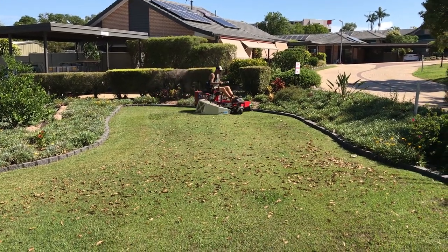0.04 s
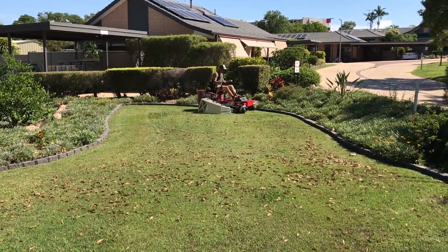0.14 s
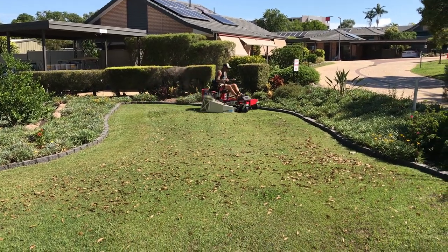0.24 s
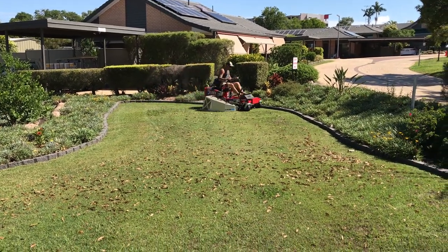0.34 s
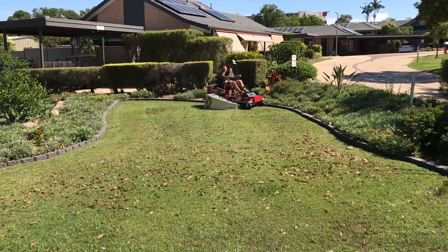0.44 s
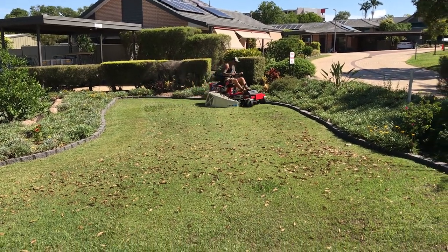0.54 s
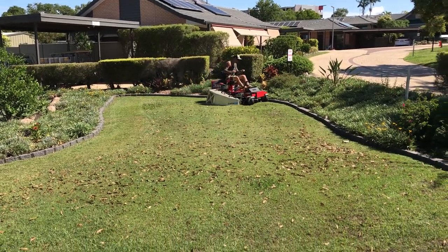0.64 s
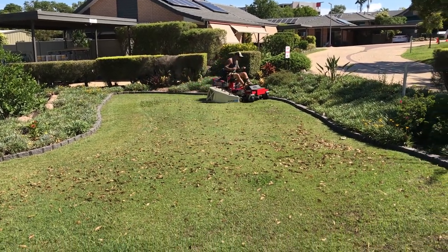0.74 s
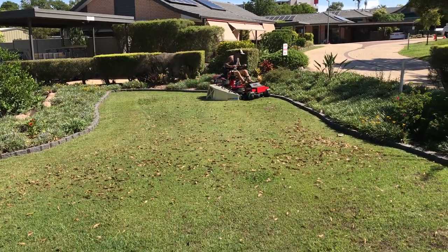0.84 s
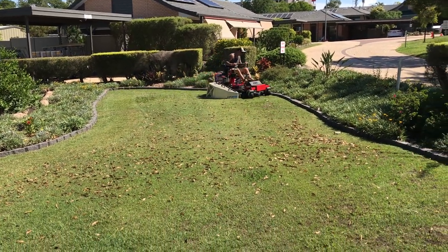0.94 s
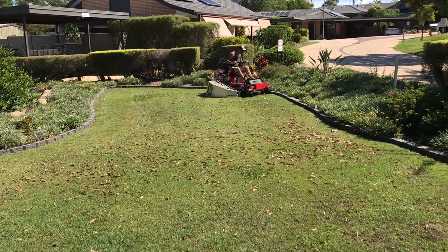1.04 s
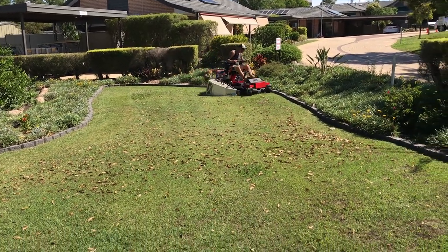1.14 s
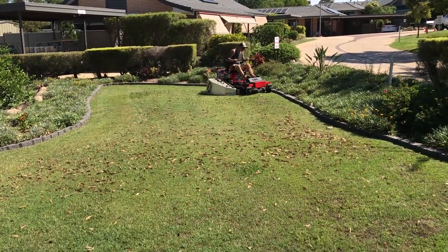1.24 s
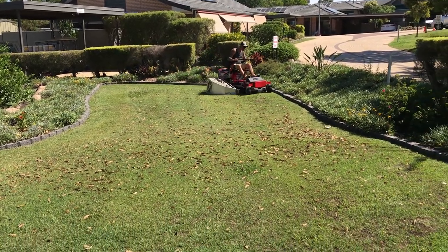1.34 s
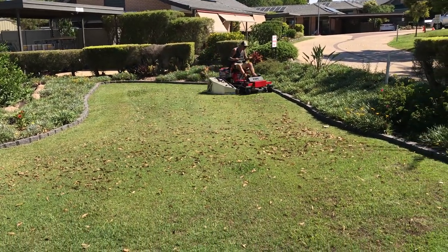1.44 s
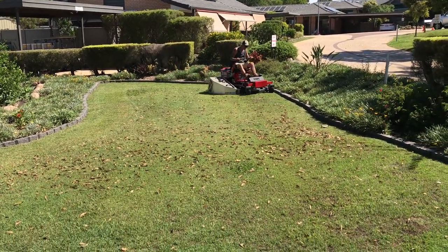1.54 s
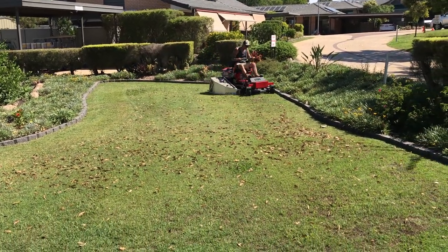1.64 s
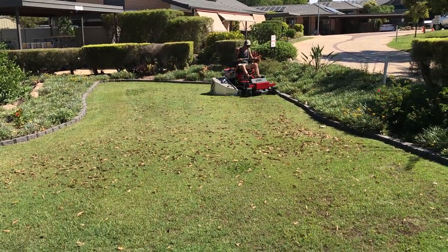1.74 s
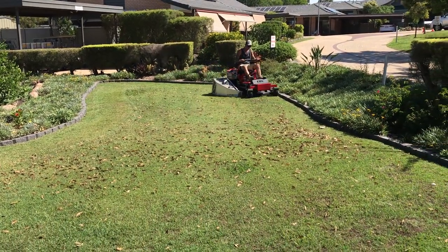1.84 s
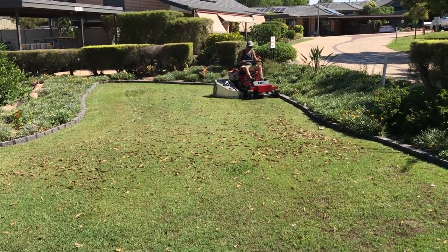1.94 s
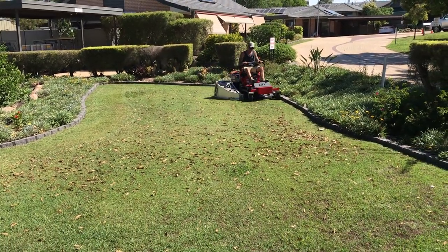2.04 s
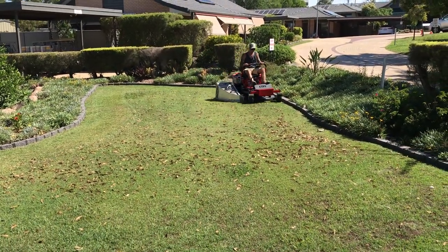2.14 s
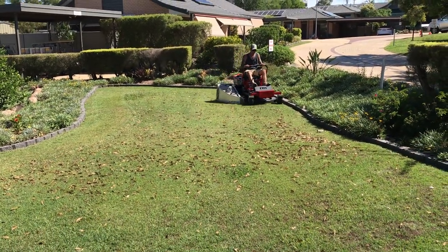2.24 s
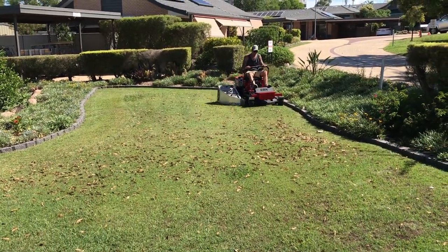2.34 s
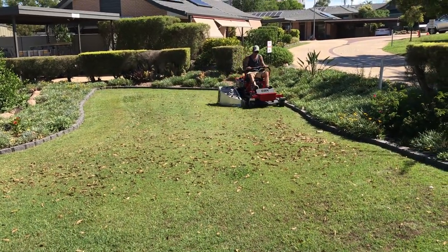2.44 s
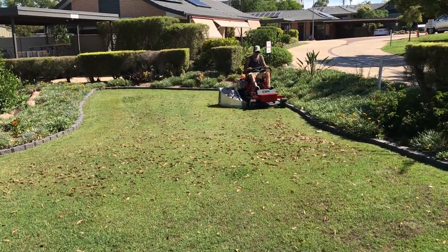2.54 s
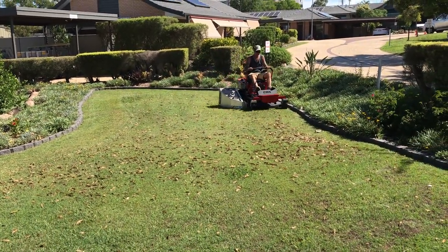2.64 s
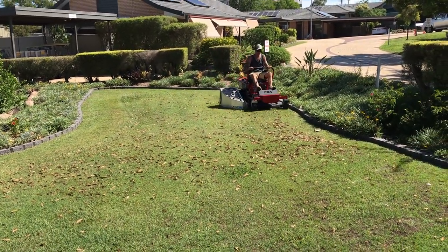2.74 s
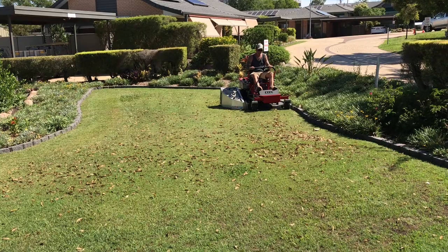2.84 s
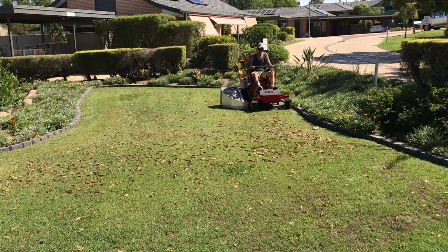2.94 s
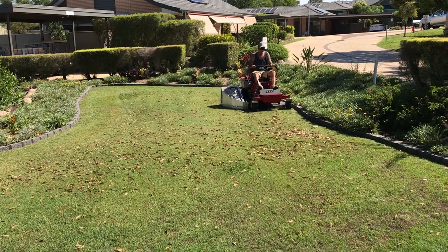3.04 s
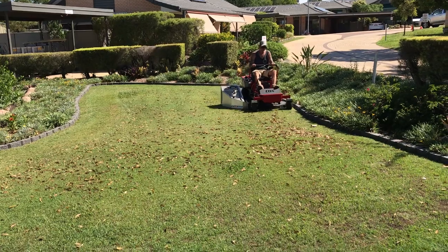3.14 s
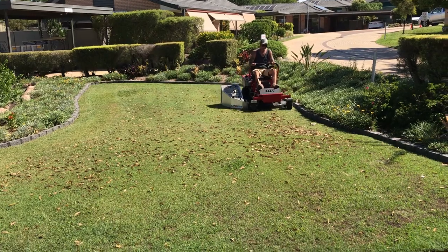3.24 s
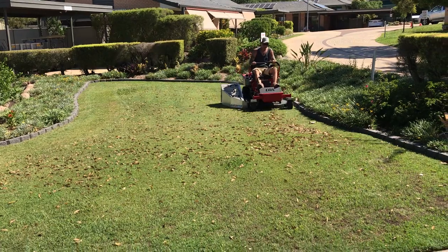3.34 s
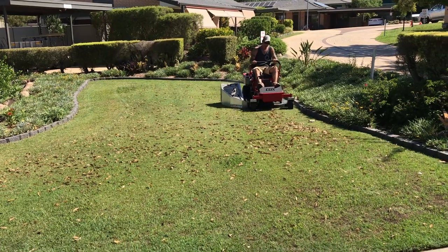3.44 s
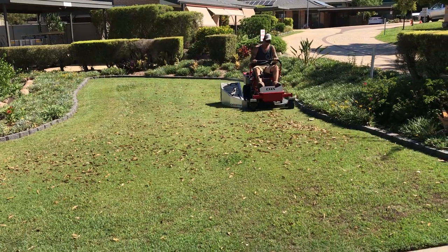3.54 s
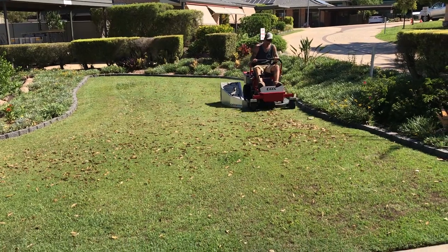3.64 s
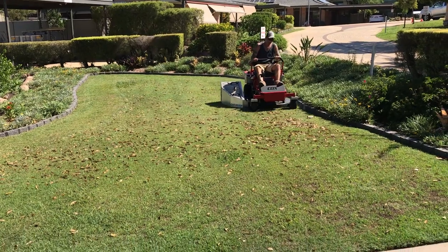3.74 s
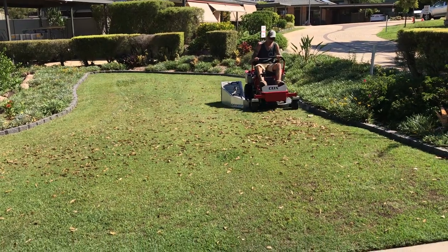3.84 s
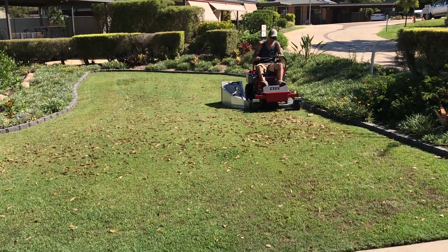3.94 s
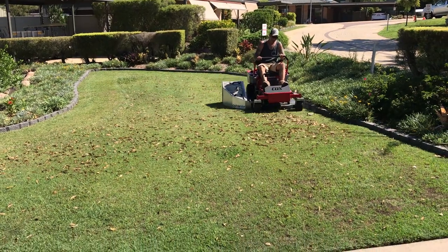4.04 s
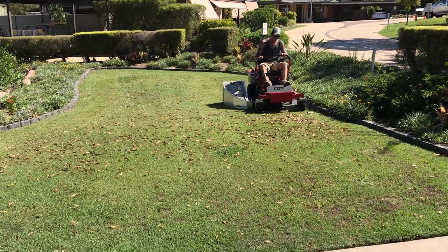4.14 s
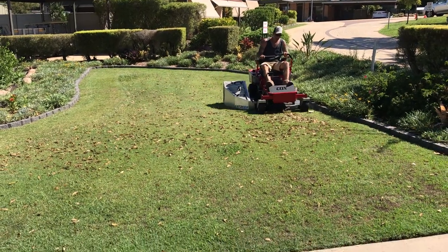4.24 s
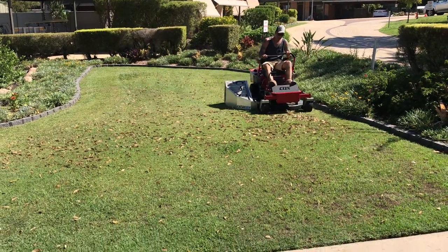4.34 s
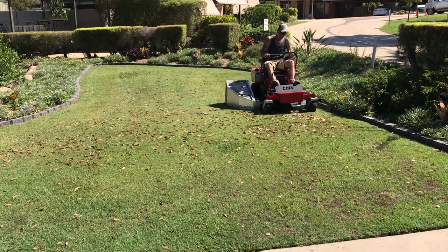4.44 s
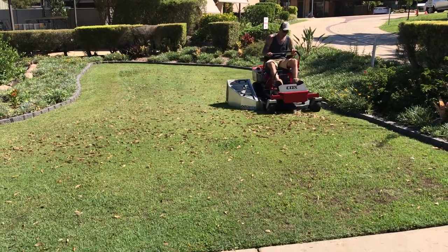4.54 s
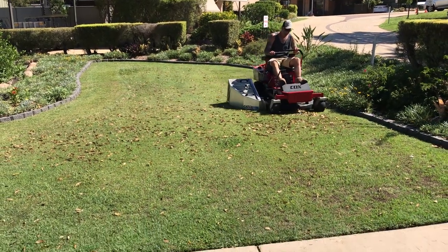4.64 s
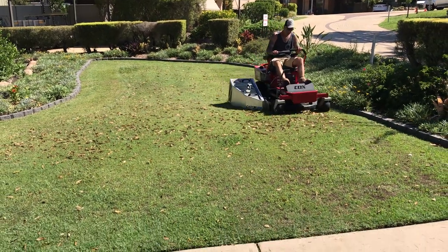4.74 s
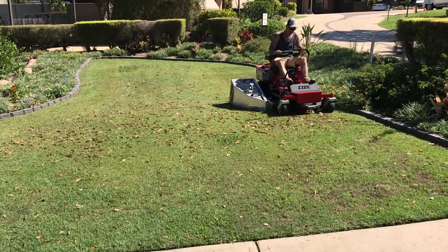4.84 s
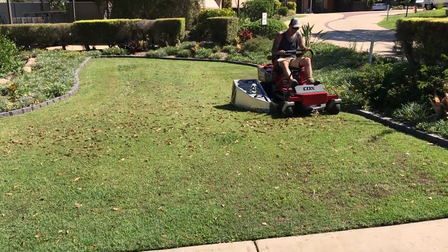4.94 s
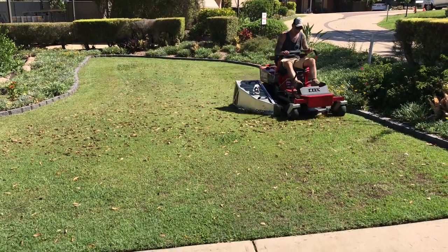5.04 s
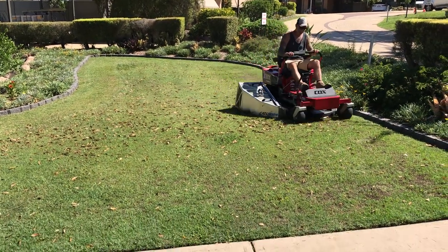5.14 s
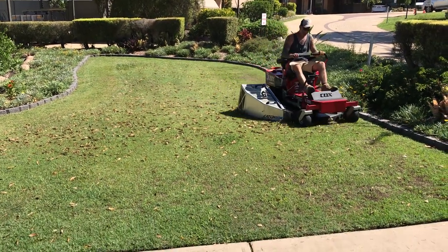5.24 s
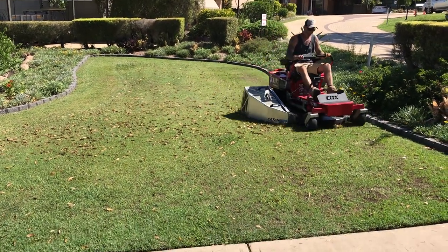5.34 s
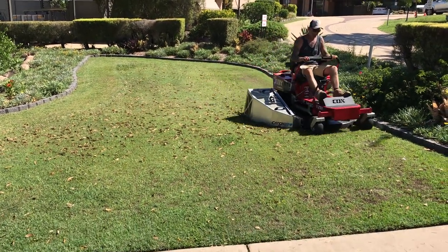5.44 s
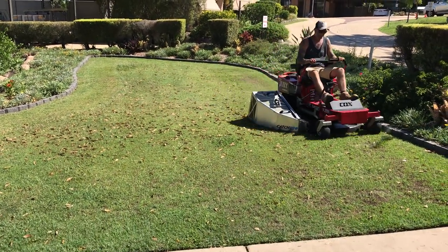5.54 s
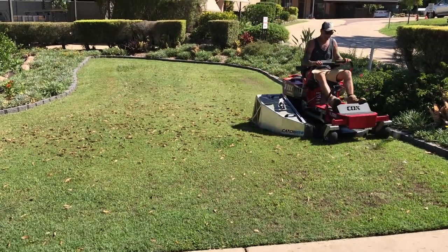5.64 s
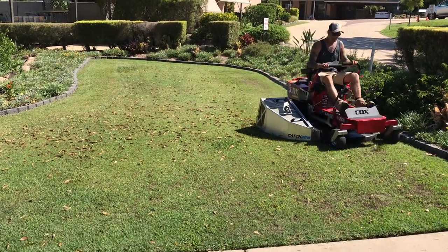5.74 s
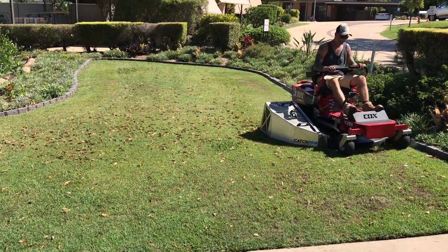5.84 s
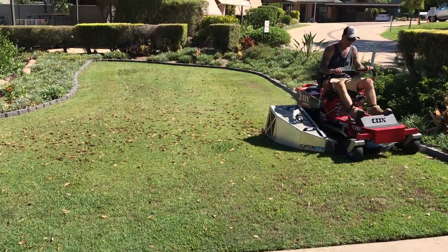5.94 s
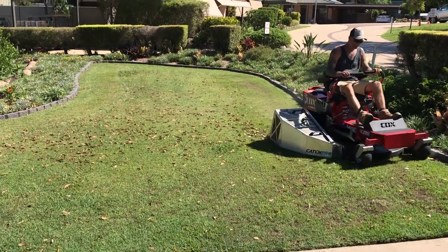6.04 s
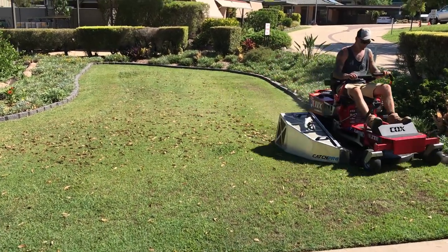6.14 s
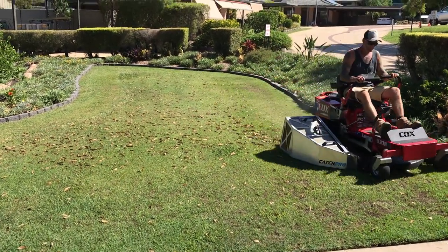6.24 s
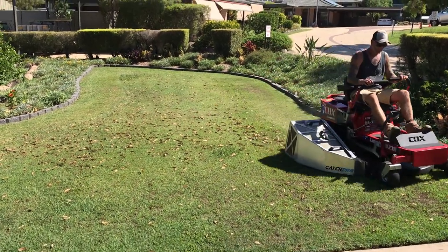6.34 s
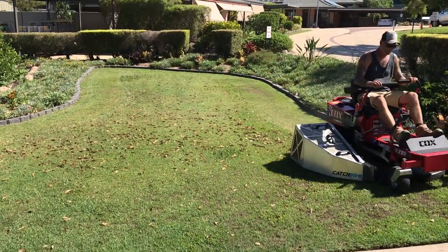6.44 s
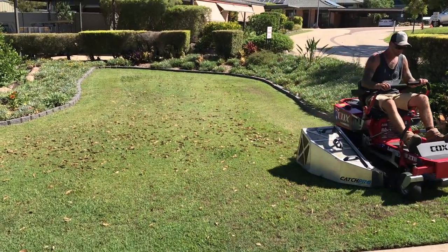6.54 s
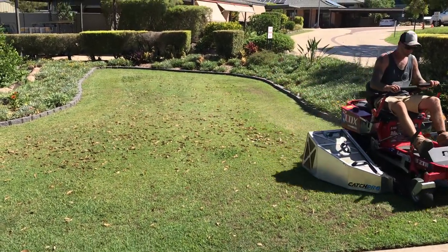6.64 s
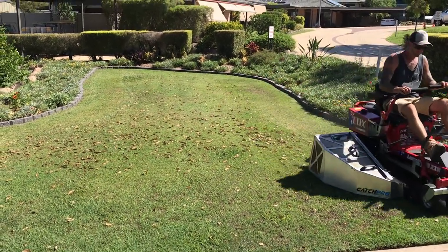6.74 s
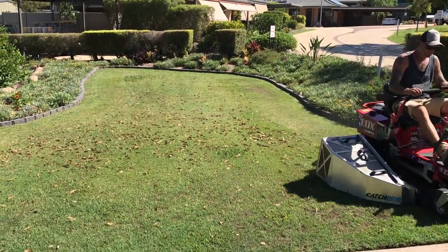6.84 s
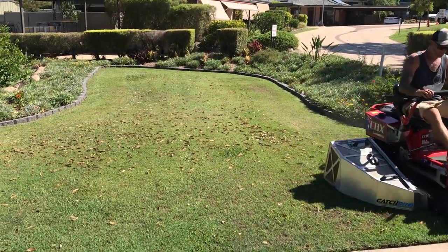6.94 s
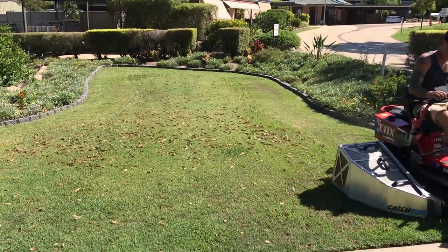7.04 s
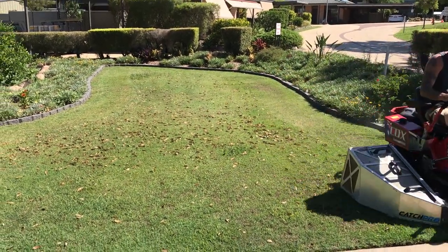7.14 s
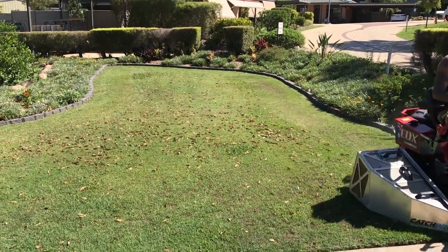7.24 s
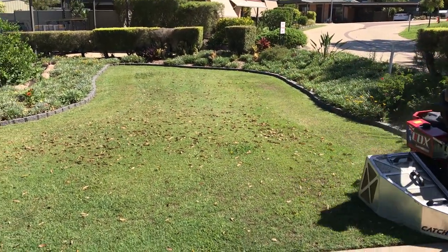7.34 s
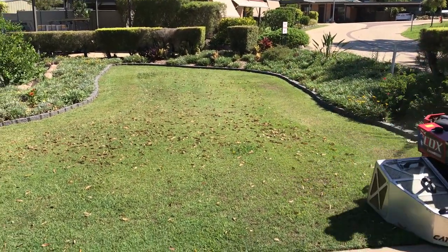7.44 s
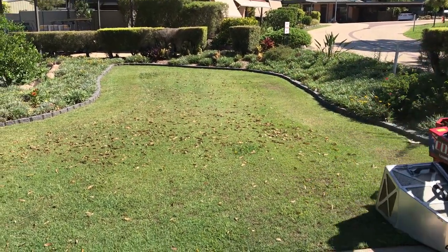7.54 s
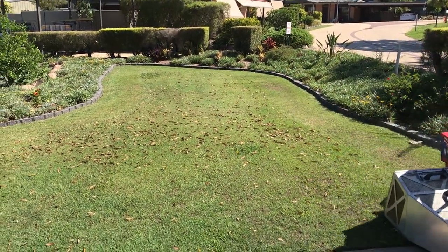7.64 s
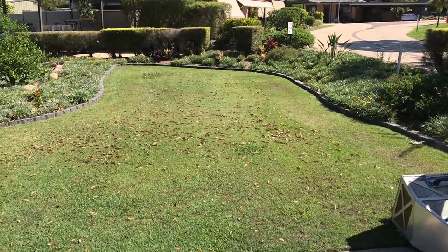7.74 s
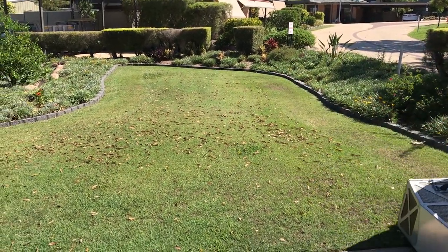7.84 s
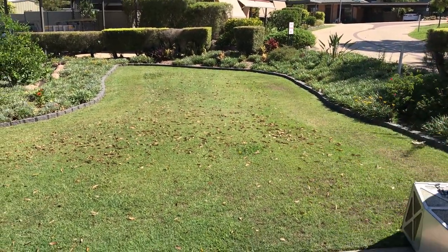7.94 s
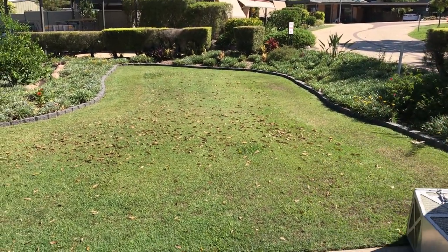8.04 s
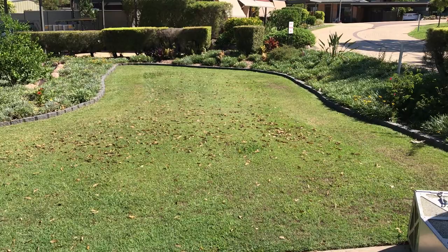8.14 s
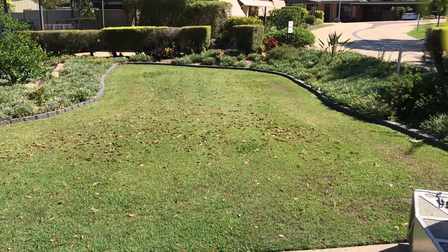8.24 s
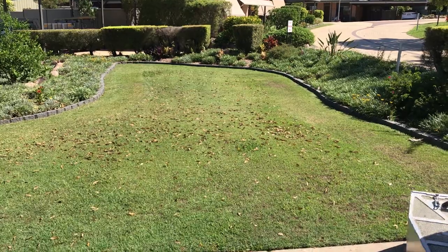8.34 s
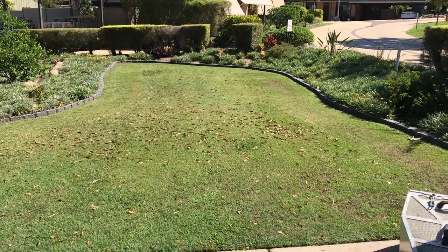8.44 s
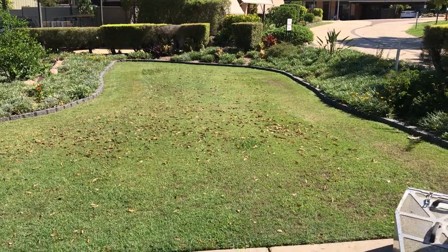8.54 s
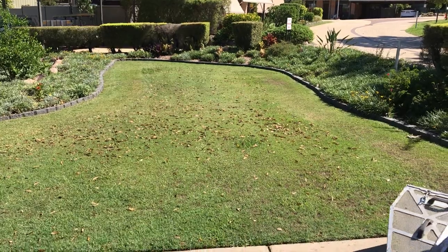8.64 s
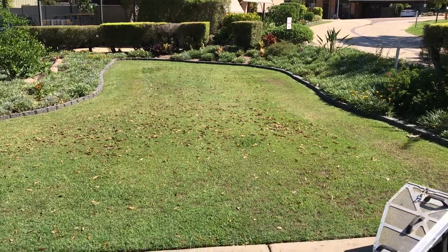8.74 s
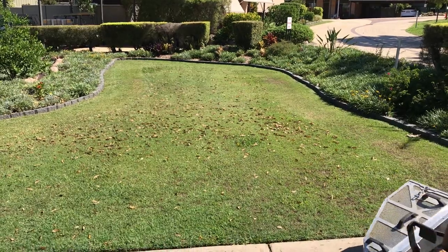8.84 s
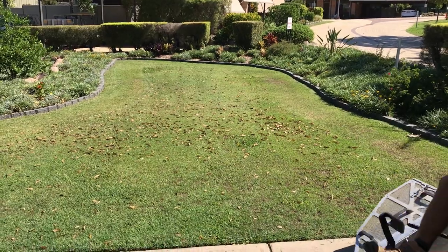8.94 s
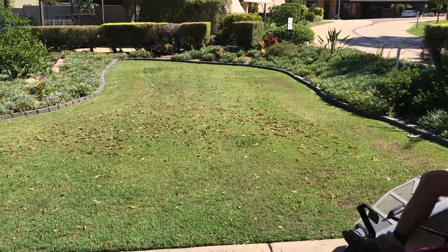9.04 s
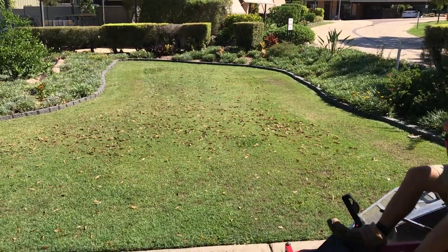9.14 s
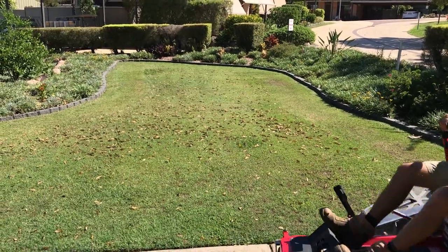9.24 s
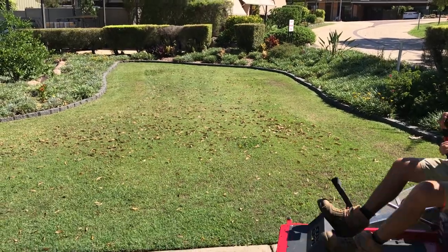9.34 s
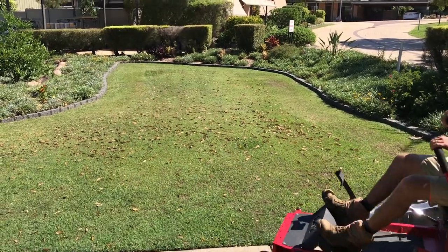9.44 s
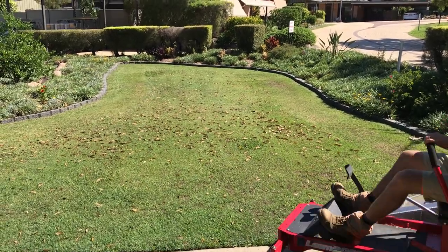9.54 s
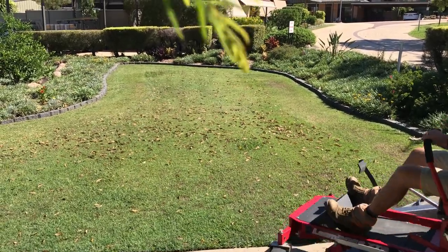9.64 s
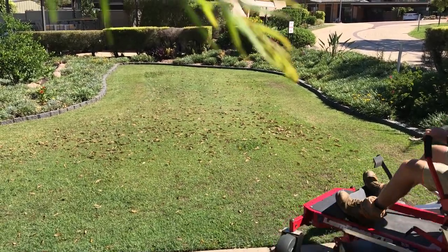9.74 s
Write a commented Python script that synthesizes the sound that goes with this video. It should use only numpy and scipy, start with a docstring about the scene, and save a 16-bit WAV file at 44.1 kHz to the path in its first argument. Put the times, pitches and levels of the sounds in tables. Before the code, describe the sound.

Steady thumping mower engine and roaring cutting deck approach from a distance, with hiss, snapping twigs, and a sharp chirp and squeal in the closing turn.

```python
"""The uneven thump of a V-twin ride-on mower nears up a lawn until it is close by and turning.
Paired firing pulses ring through a muffler filter, looped noise clatters, and chopped noise roars in the deck.
Coloured hiss is cooling air, short noise cracks are shredded grass, dry leaves and twigs.
Swept sines make the running gear chirp now and then and squeal in the turn; one microphone hears it all."""
import sys
import numpy as np
from scipy import signal
from scipy.fft import rfft, irfft
from scipy.io import wavfile
from scipy.ndimage import uniform_filter1d

SR = 44100
rng = np.random.default_rng(int(sys.argv[2]) if len(sys.argv) > 2 else 0)


def file_out(sig):
    """Save sig as 16-bit WAV at sys.argv[1]."""
    # one column per channel
    cols = np.atleast_2d(sig).T
    # limit, then scale
    lim = np.clip(cols, -1, 1)
    pcm = np.round(lim * 32767).astype(np.int16)
    wavfile.write(sys.argv[1], SR, pcm)


N = 432180
T = np.arange(N) / SR  # time of each sample, s


def undb(db):
    """Decibels to gain."""
    return 10 ** (np.asarray(db) / 20)


def unit(x):
    """Scale to rms 1."""
    return x / np.std(x)


def curves(table):
    """Draw each column of a (time, values) table as an automation curve, one value a sample."""
    s, *columns = np.transpose(table)
    return [np.interp(T, s, column) for column in columns]


def bump(s, half):
    """A smooth rise and fall that peaks at 1 at time s."""
    return np.exp(-((T - s) / half) ** 2)


def walk(rate):
    """Random levels held 1 / rate s and slewed twice; spread near 1."""
    size = 8  # steps per held level
    held = np.repeat(rng.standard_normal(8192), size)
    slewed = uniform_filter1d(uniform_filter1d(held, size), size)
    return 1.39 * np.interp(T * rate * size, np.arange(len(held)), slewed)


def colour(x, points):
    """Causal minimum-phase filter with the given (Hz, dB) response."""
    size = 16384
    hz, db = np.transpose(points)
    bin_hz = np.arange(size // 2 + 1) * SR / size
    log_gain = np.log(undb(np.interp(np.log(bin_hz + 1), np.log(hz), db)))
    # folding the cepstrum forward in time makes the response causal
    cepstrum = irfft(log_gain)[:size // 2]
    cepstrum[1:] *= 2
    response = irfft(np.exp(rfft(cepstrum, size)))[:size // 2]
    return signal.fftconvolve(x, response)[:len(x)]


def noise(points):
    """Noise of rms 1 with the given spectrum."""
    return unit(colour(rng.standard_normal(N), points))


def approach(x, table, near):
    """Crossfade a source through its far, halfway and alongside spectra as it nears."""
    table = np.array(table)
    out = 0
    for k in range(table.shape[1] - 1):
        share = np.maximum(1 - np.abs(near - k), 0)
        out = out + share * unit(colour(x, table[:, [0, k + 1]]))
    return out


def carry(metres, level_db, loss_db):
    """Gain over distance: a level at 1 m and a loss per doubling of distance."""
    return undb(level_db - loss_db * np.log2(metres))


def tones(turns, orders):
    """Sine lines locked to a shaft, each wavering in level and phase."""
    waver_db, wander_rad = 2.6, 0.9
    out = 0
    for order, db in orders:
        level = undb(db + waver_db * walk(4))
        phase = 2 * np.pi * round(order) * turns + wander_rad * walk(6)
        out = out + level * np.sqrt(2) * np.sin(phase)
    return out


def load(delay=0):
    """How far thick grass pulls the engine's cycle rate down, in Hz."""
    # patches of thick grass: (time [s], half length [s], sag [Hz])
    thick_grass = [(1.098, .35, .2), (2.045, .4, .33), (3.145, .13, .24), (4.723, .16, .3),
                   (5.483, .15, .38), (6.598, .26, .42), (9.086, .35, .15), (9.8, 0.23, 0.56)]
    return sum(sag * bump(s + delay, half) for s, half, sag in thick_grass)


def rumble(metres, waver_db=3):
    """Low buffeting: bass-heavy noise that wavers and now and then swells."""
    # spectrum of the buffeting: (frequency [Hz], level per Hz [dB])
    buffeting = [(8, -78), (33, -31), (48, -7), (65, -7), (90, -8), (130, -1.5), (230, -7.5), (400, -20),
                 (900, -40.5)]
    # swells of the buffeting: (time [s], half length [s], level [dB])
    surges = [(.25, 0.16, -37), (2.3, .2, -42), (3.023, 0.092, -33.5), (4.003, 0.087, -33),
              (4.82, 0.065, -30), (6.35, 0.21, -38), (7.403, 0.25, -26), (9.4, .1, -23)]
    steady = carry(metres, level_db=-28.5, loss_db=3.3) * undb(waver_db * walk(5))
    swells = sum(undb(db) * bump(s, half) for s, half, db in surges)
    return noise(buffeting) * np.hypot(steady, swells)


def cooling_air(spindle, metres, pulsing=0.12, flicker_db=1.0, outlet_waver_db=0.5):
    """Hiss that pulses once a blade turn; the outlet adds its own rush once it faces the listener."""
    # spectrum of the cooling air: (frequency [Hz], level per Hz [dB])
    air_hiss = [(1500, -6.5), (2900, -4), (3600, 4.5), (4500, 3), (5100, 2), (5800, 4), (7200, -3.5),
                (9000, -6), (11500, -12), (16000, -23)]
    # spectrum of the air outlet, heard close by: (frequency [Hz], level per Hz [dB])
    outlet_rush = [(1650, -43.5), (2800, -7.5), (4040, 0.5), (5790, -0.5), (7630, -9.5), (9370, -15),
                   (10300, -16.5), (11600, -15), (13000, -19.5)]
    # the outlet comes into view as the mower draws level, and swings in the turn:
    # (time [s], level against the hiss [dB])
    outlet_view = [(7.1, -30), (7.32, 2), (8.15, 6), (8.7, 3), (9.1, 7), (9.8, 7)]
    outlet = noise(outlet_rush) * undb(curves(outlet_view)[0] + outlet_waver_db * walk(8))
    pulse = 1 + pulsing * np.cos(2 * np.pi * spindle)
    level = carry(metres, level_db=-26, loss_db=5.33) * undb(flicker_db * walk(16))
    return (noise(air_hiss) + outlet) * pulse * level


def shredding(spindle, near, snaps_per_s=520, spread_db=4.8, snap_s=0.0007, bunching=0.7,
              spray_far=0.3, spray_rise_db=6, tuft_db=1.3):
    """Leaves and stalks snap in bunches once a blade turn; close by, spray of clippings fills the gaps."""
    # spectrum of shredded grass and leaves: (frequency [Hz], level per Hz [dB])
    shred_spectrum = [(1500, -12), (3000, -5), (5700, 1.5), (7400, -1), (8600, 6), (10000, 4.5), (12500, 3),
                      (16000, 0.5)]
    # dry leaves under the blades: a rise in mid-lawn, a lull as the turn begins, most at the end:
    # (time [s], shredding level [dB])
    leaves = [(0, -56), (1, -53), (1.6, -51.5), (3.1, -49), (4.5, -42.5), (5.35, -37), (5.9, -42.5),
              (7.15, -42.5), (7.35, -37), (7.65, -42), (8.7, -53), (9.8, -34)]
    density = snaps_per_s / SR * (1 + bunching * np.cos(2 * np.pi * spindle))
    sizes = undb(spread_db * np.minimum(rng.exponential(size=N), 4.3))
    # each snap is a sudden crack that dies within a millisecond or two
    hits = (rng.random(N) < density) * sizes ** 2
    energy = signal.lfilter([1], [1, -np.exp(-1 / (snap_s * SR))], hits)
    snaps = unit(np.sqrt(energy) * rng.standard_normal(N))
    spray = spray_far * undb(spray_rise_db * near)
    mix = (snaps + spray * rng.standard_normal(N)) / np.sqrt(1 + spray ** 2)
    tufts = undb(tuft_db * walk(25))
    return unit(colour(mix, shred_spectrum)) * tufts * undb(curves(leaves)[0])


def twigs(decay_s=0.0014, width=0.58):
    """Each blade hit is a very short noise crack around its own pitch."""
    # the largest twigs hit by a blade: (time [s], peak level [dB], pitch before a 14 kHz cap [Hz])
    twig_hits = [(0.0817, -25, 8660), (0.598, -29, 9330), (2.0343, -19.5, 7710), (4.2552, -23, 8280),
                 (4.3897, -17, 9080), (4.901, -19, 8240), (4.9134, -22, 8230), (5.1226, -16.5, 12600),
                 (5.36, -19, 11600), (5.5262, -15, 8310), (5.8691, -20, 9490), (6.6772, -15.5, 14800),
                 (7.4654, -13, 7140)]
    out, t = np.zeros(N), T[:512]
    for s, db, hz in twig_hits:
        burst = rng.standard_normal(len(t)) * np.exp(-t / decay_s)
        crack = signal.lfilter(*signal.iirpeak(min(hz, 14000), 1 / width, fs=SR), burst)
        i = int(s * SR)
        out[i:i + len(t)] += undb(db) * crack / np.abs(crack).max()
    return out


def chirps(fall_hz_per_s=4000, second_db=-10, third_db=-21, wobble_rad=0.4):
    """Metal rubs and rings for a moment; the harder the rub, the stronger its overtones."""
    # chirps of the running gear: (time [s], fundamental's peak level [dB], mid pitch [Hz], half length [s])
    gear_chirps = [(2.034, -31, 4675, .003), (3.444, -39, 4610, .011), (4.338, -40, 4600, .008),
                   (5.94, -32, 4580, 0.0082), (6.77, -27, 4500, .005), (7.288, -31, 4830, .006),
                   (7.333, -27.5, 4630, 0.0068), (7.336, -31, 5200, .006), (8.058, -16, 4660, 0.004),
                   (8.069, -5, 4590, 0.0046), (8.085, -17, 4540, .006)]
    out, t = np.zeros(N), T[:4096] - T[2048]
    unsteady = wobble_rad * walk(470)
    for s, db, hz, half in gear_chirps:
        i = int(s * SR) - len(t) // 2
        swell = undb(db) * np.exp(-(t / half) ** 2)
        phase = 2 * np.pi * (hz * t - fall_hz_per_s * t ** 2 / 2) + unsteady[i:i + len(t)]
        overtones = undb(second_db) * np.sin(2 * phase) + undb(third_db) * np.sin(3 * phase)
        out[i:i + len(t)] += swell * (np.sin(phase) + swell * overtones)
    return out


def squeal(flutter_hz=18, rough_db=2.0, octave_db=-22):
    """Rough friction tone as the machine steers round: it catches in bursts and slides softly between."""
    # bursts of the drive's squeal: (start [s], length [s], level [dB], pitch [Hz])
    catches = [(8.54, 0.13, -16, 1097), (8.68, 0.074, -21.5, 1067), (8.803, 0.039, -18.5, 1097),
               (9.013, 0.037, -20, 1115), (9.061, 0.032, -24, 1112), (9.103, 0.046, -20, 1071),
               (9.149, 0.075, -18.5, 1072)]
    attack_s, release_s = 0.018, 0.0099
    slide_s, slide_db = 0.76, -29
    start, length, db, hz = np.transpose(catches)

    def envelope(s, hold):
        """Linear attack, then exponential release once the hold is over."""
        attack = np.clip((T - s) / attack_s, 0, 1)
        return attack * np.exp(-np.maximum(T - s - hold, 0) / release_s)

    bursts = np.max([undb(d) * envelope(s, hold) for s, hold, d in zip(start, length, db)], axis=0)
    sliding = undb(slide_db) * envelope(start[0], slide_s)
    pitch = np.interp(T, start + length / 2, hz) + flutter_hz * walk(120)
    phase = 2 * np.pi * np.cumsum(pitch) / SR
    tone = np.sin(phase) + undb(octave_db) * np.sin(2 * phase)
    return np.maximum(bursts, sliding) * undb(rough_db * walk(70)) * tone


def shell(sag, near, ring_hz=2230, ring_q=10):
    """Clippings drum on the steel deck: one broad mode rings harder under load, masked close by."""
    level_db, db_per_sag_hz, db_per_near = -17, 16, -5  # against the deck roar
    mode = signal.iirpeak(ring_hz, ring_q, fs=SR)
    ringing = unit(signal.lfilter(*mode, signal.lfilter(*mode, rng.standard_normal(N))))
    return ringing * undb(level_db + db_per_sag_hz * sag + db_per_near * near)


def whine(cycle, flutter=0.62):
    """Wavering engine tones; those that stand out in turn flutter as the machine jolts over the lawn."""
    # valve gear and cooling fan: (multiple of the cycle rate [ratio], level against the deck roar [dB])
    engine_tones = [(14, -27), (16, -26), (18, -30), (23, -21), (28, -25), (32, -24), (46, -28), (59, -29),
                    (69, -29), (77, -28)]
    # tones that stand out for a while as the machine turns:
    # (time [s], half length [s], level against the deck roar [dB], multiple of the cycle rate [ratio])
    beams = [(.6, 0.79, -16, 32), (1.6, 0.63, -5, 2), (2.1, .4, -21, 23), (3.2, .6, -17, 28),
             (6.3, 0.88, -16.5, 28), (8.105, 0.23, -11, 23), (8.82, 0.4, -5.5, 11), (8.8, 0.35, -15, 16),
             (9.19, 0.13, -12.5, 23), (9.645, 0.29, -11.5, 13)]
    out = tones(cycle, engine_tones)
    for s, half, db, order in beams:
        out = out + bump(s, half) * tones(cycle, [(order, db)]) * (1 + flutter * walk(22))
    return out


def deck(cycle, spindle, near, clatter_db=-4.0, chop=0.16, throb=0.091):
    """Air chopped twice a blade turn, with engine clatter that repeats each cycle and slowly changes."""
    # air churned in the deck; the lawn swallows a band near 430 Hz from afar:
    # (frequency [Hz], far level [dB], halfway level [dB], alongside level [dB])
    deck_spectra = [(146, 2.5, -2, -3.5), (336, -3.5, 1, 3), (450, -8.5, -10.5, 1), (520, -2, -4, 3),
                    (640, -3, 0, 1), (830, 0, 0, -2.5), (1000, -3, -2.5, 3.5), (1350, -2, -6.5, -0.5),
                    (1710, -4, -7.5, -2), (1810, -5.5, -10.5, -2), (2150, -5, -10.5, -6),
                    (2460, -10.5, -14.5, -10.5), (2800, -12, -19, -18), (4620, -24.5, -32, -52.5)]
    size = 1520  # steps in one engine cycle
    place = (cycle % 1 * size).astype(int)
    # six looped noise patterns fade in and out against each other
    clatter = unit(sum(walk(0.702) * rng.standard_normal(size)[place] for _ in range(6)))
    air = rng.standard_normal(N) * (1 + chop * np.cos(4 * np.pi * spindle))
    churn = (air + undb(clatter_db) * clatter) * (1 + throb * np.sin(2 * np.pi * cycle))
    return approach(churn, deck_spectra, near) * undb(0.49 * walk(9))


def blade_hum(spindle):
    """The turning blades hum at low multiples of their spindle rate."""
    # hum of the blades: (multiple of the spindle rate [ratio], level against the exhaust [dB])
    hum_tones = [(1, -17.5), (2, -22.5), (4, -24.5)]
    return tones(spindle, hum_tones)


def crank(cycle, near, far_db=-16.5, rise_db=3.5, waver_db=2):
    """The crankshaft shakes the frame twice a cycle, a deep hum that grows with nearness."""
    level = undb(far_db + rise_db * near + waver_db * walk(7))
    return np.sqrt(2) * np.sin(4 * np.pi * cycle) * level


def exhaust(cycle, near, second_db=-4.0, scatter_db=0.27, jitter_s=0.00013, rasp=0.019):
    """Two cylinders fire 450 and 270 crank degrees apart, one louder; each firing lets out a puff of gas."""
    # muffler response: (frequency [Hz], far level [dB], halfway level [dB], alongside level [dB])
    muffler = [(8, -73, -77, -69), (30, -43, -52, -29), (67, -59, -56, -26.5), (117, -7, -1.5, -0.5),
               (198, -4, -0.5, 0), (251, -4, 3.5, 2), (303, -16, -9, -6.5), (377, -31, -14, -10),
               (478, -23, -30.5, -12.5), (900, -63.5, -43, -51)]
    drone_db, side_on_db, swing_s = -1, 18.5, 1.1
    puff_s = 0.0063
    pulses = np.zeros(N)
    count = np.arange(int(cycle[-1]))
    for offset, db in ((0, 0), (5 / 8, second_db)):  # place in the cycle, level
        chance = rng.standard_normal((len(count), 2))
        s = np.interp(count + offset, cycle, T) + jitter_s * chance[:, 0]
        pulses[np.clip((s * SR).astype(int), 0, N - 1)] += undb(db + scatter_db * chance[:, 1])
    puff_envelope = signal.lfilter([1], [1, -np.exp(-1 / (puff_s * SR))], pulses)
    puffs = puff_envelope * rng.standard_normal(N)
    # the pipe rings on between firings and smooths the thumps into a drone
    ring = signal.lfilter(*signal.iirpeak(145, 14, fs=SR), pulses)
    # the mower starts side-on, its tailpipe drone strong, and swings to face the listener
    drone = undb(drone_db + side_on_db * np.exp(-T / swing_s))
    blend = (pulses + rasp * puffs + drone * ring) / (1 + 0.34 * drone)
    return -approach(blend, muffler, near)


def scene():
    """The engine turns the blades through a belt; everything grows louder and fuller as the mower nears."""
    # the mower's path: (time [s], distance [m])
    path = [(0, 15.1), (3.1, 14.5), (4.5, 10.7), (6.3, 6), (7.5, 4.22), (9, 3.02), (9.8, 2.73)]
    far_m, halfway_m, alongside_m = 20.1, 9.7, 2.7  # where the three spectra hold
    governed_hz, rebound_s, rebound_share = 29.11, 0.45, 0.3
    blade_ratio = 2.314  # blade turns per engine cycle
    effort_db_per_sag_hz = 0.5

    metres, = curves(path)
    # nearness: 0 far, 1 halfway, 2 alongside
    near = np.interp(1 / metres, [1 / far_m, 1 / halfway_m, 1 / alongside_m], [0, 1, 2])
    # the governor holds the four-stroke cycle rate, and overshoots a little after each sag
    sag = load()
    cycle = np.cumsum(governed_hz - sag + rebound_share * load(rebound_s)) / SR
    spindle = blade_ratio * cycle

    background = rumble(metres) + cooling_air(spindle, metres)
    cutting = shredding(spindle, near) + twigs()
    running_gear = chirps() + squeal()
    middle = shell(sag, near) + whine(cycle) + deck(cycle, spindle, near)
    middle = middle * carry(metres, level_db=-13, loss_db=5.98)
    # the throttle opens under load and the exhaust grows louder
    low = blade_hum(spindle) + crank(cycle, near) + exhaust(cycle, near)
    low = low * carry(metres, level_db=-15.5, loss_db=3.65) * undb(effort_db_per_sag_hz * sag)
    mower = background + cutting + running_gear + middle + low
    return np.array([mower, mower])


def record(dry, notch_hz=10400, notch_q=11, notch_depth=0.5, bass_hz=36, top_hz=16000):
    """The microphone sheds the deepest bass, its port dips narrowly in the treble; the top is cut off."""
    heard = dry - notch_depth * signal.lfilter(*signal.iirpeak(notch_hz, notch_q, fs=SR), dry)
    heard = signal.sosfilt(signal.butter(3, bass_hz, "high", fs=SR, output="sos"), heard)
    return signal.sosfilt(signal.ellip(10, 0.2, 80, top_hz, fs=SR, output="sos"), heard)


dry = scene()
out = record(dry)
file_out(out)
```